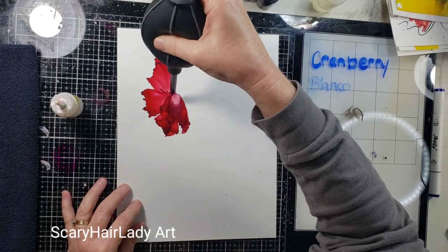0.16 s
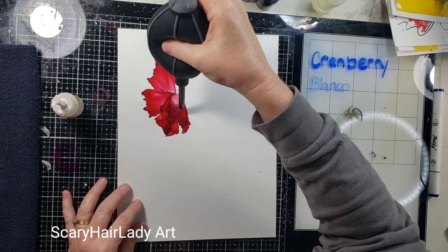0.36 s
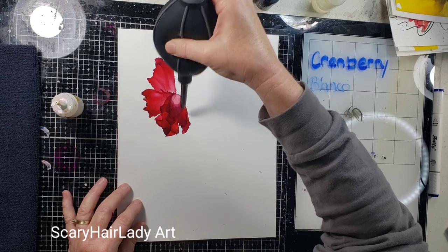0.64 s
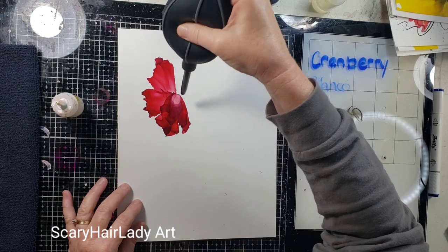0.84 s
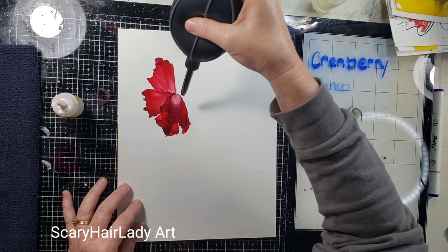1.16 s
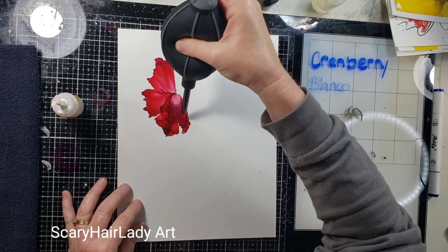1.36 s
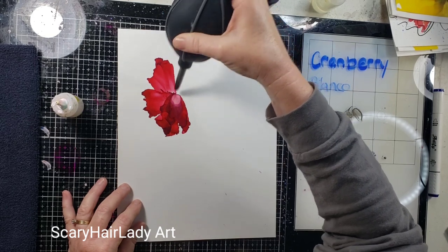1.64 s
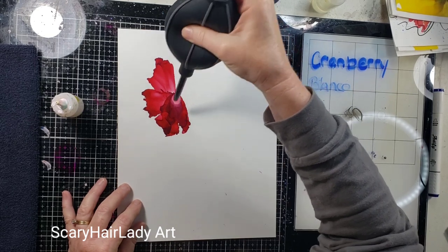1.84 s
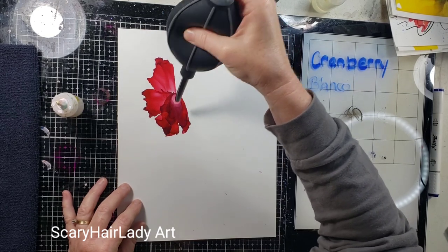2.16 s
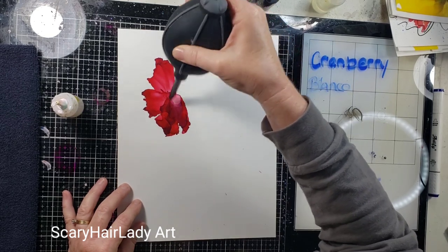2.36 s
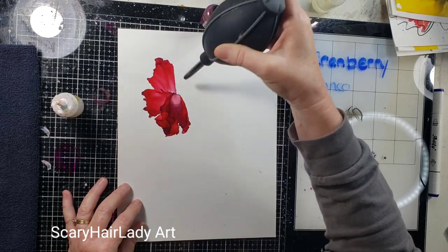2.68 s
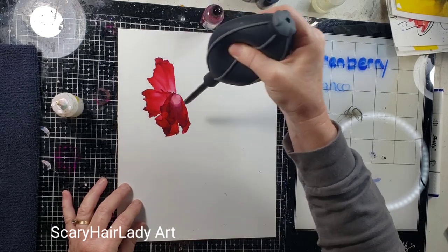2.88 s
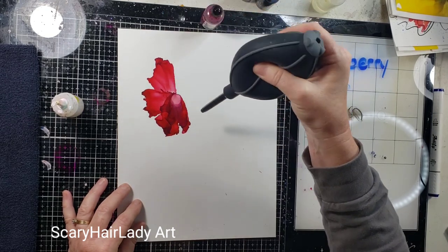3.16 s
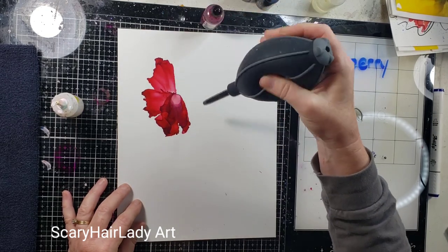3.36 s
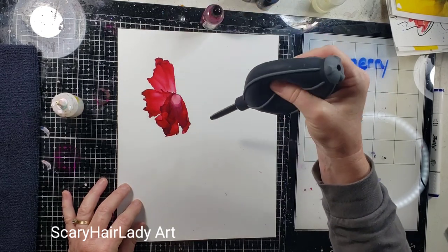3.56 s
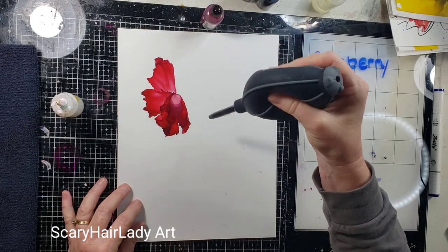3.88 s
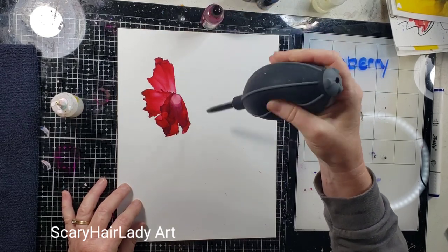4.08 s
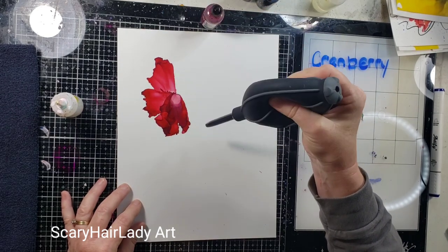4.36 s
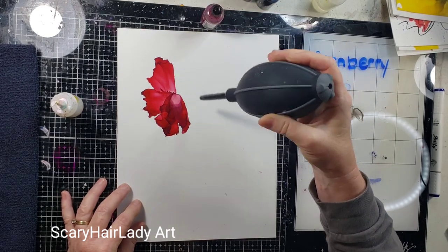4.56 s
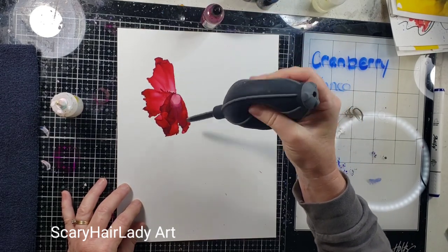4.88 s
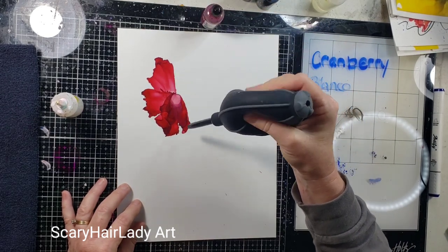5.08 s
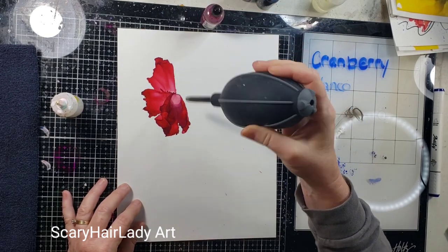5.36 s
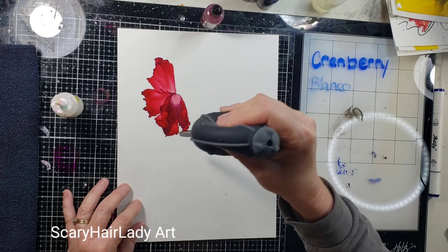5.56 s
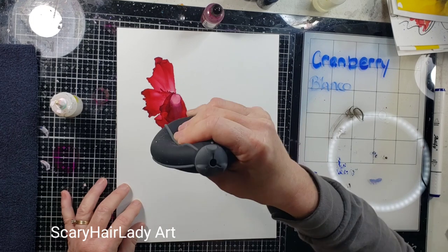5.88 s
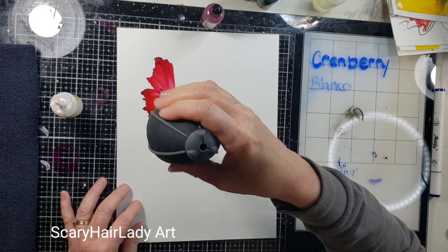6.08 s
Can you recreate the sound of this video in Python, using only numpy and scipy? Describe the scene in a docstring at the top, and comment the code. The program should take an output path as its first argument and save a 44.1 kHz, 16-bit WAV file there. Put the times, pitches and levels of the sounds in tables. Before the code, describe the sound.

A rubber bulb blower is pumped about three times a second, hissing sharp air jets and thinner intake hisses, with dull rubber thumps later.

```python
"""Rubber bulb blower, pumped by hand

A rubber bulb blower is pumped about three times a second over a desk, in a small quiet room.
Each squeeze is an arch of shaped noise, a hissing jet; each release is a thinner, at times whistling hiss.
Soft ticks of the valve flap come first. Halfway the pumping gets harder, and the rubber thumps as it folds
and springs back: short sums of decaying modes. Faint rumble, hiss and mains hum lie underneath."""
import sys
import numpy as np
from scipy import signal
from scipy.fft import rfft, irfft
from scipy.io import wavfile
from scipy.ndimage import uniform_filter1d

SR = 44100
rng = np.random.default_rng(int(sys.argv[2]) if len(sys.argv) > 2 else 0)


def master_out(mix):
    """Clip the mix to full scale and print it as 16-bit PCM to the path in sys.argv[1]."""
    frames = np.transpose(np.atleast_2d(mix))
    ceiling = np.clip(frames, -1, 1)
    pcm = np.round(ceiling * 32767).astype(np.int16)
    wavfile.write(sys.argv[1], SR, pcm)


N = 274741


def gain_of(db):
    """Decibels to amplitude."""
    return 10 ** (np.asarray(db) / 20)


def evened(x):
    """Scales to rms 1."""
    return x / np.sqrt(np.mean(x ** 2) + 1e-20)


def read(points, hz):
    """Reads a table of (frequency, value) on a log-frequency axis."""
    f, value = np.transpose(points)
    return np.interp(np.log(hz + 1), np.log(f + 1), value)


def read_at(points, time_s):
    """Reads a table of (time, value) along straight lines."""
    return np.interp(time_s, *np.transpose(points))


def add(mix, s, sound):
    """Adds a stereo sound to the mix at time s."""
    part = mix[:, max(round(s * SR), 0):][:, :sound.shape[1]]
    part += sound[:, :part.shape[1]]


def panned(left_db):
    """Gains of the two microphones for a left-right difference in dB."""
    return gain_of(np.array([[.5], [-.5]]) * left_db)


def noise_pair(size, likeness):
    """Spectra of two white noises that are partly alike (likeness 1: identical)."""
    a, b = rfft(rng.standard_normal((2, size)))
    c = np.clip(likeness, -1, 1)
    return np.array([a, c * a + np.sqrt(1 - c ** 2) * b])


def band_noise(size, hz, width_hz, likeness):
    """Stereo noise in one resonance, rms 1."""
    f = np.fft.rfftfreq(size, 1 / SR)
    resonance = 1 / (1 + (2 * (f - hz) / width_hz) ** 2)
    return evened(irfft(noise_pair(size, likeness) * resonance, size))


# colour of the room's rumble and hiss: pitch_hz, relative density (dB per Hz)
FLOOR_COLOUR = [(20, -18.5), (40, -7.5), (65, 6.5), (100, -3.5), (140, -7.5), (250, -14.5), (500, -22),
                (800, -15.5), (1200, -25), (3000, -28), (8000, -26.5), (15000, -20)]
# partials of the mains hum: pitch_hz, level_db (rms, before the hum trim and its wavering)
HUM_PARTIALS = [(59.2, -81), (242.2, -93), (301.5, -95.5), (360.7, -96), (479.1, -97.5), (839.8, -93.5)]


def background():
    """Low rumble of the building and faint hiss as shaped noise, with a wavering mains hum of sines."""
    hz, t = np.fft.rfftfreq(N, 1 / SR), np.arange(N) / SR
    likeness = read([(100, 0.85), (300, 0.35), (1000, 0.117), (5000, 0.12)], hz)
    wash = evened(irfft(noise_pair(N, likeness) * gain_of(read(FLOOR_COLOUR, hz)), N))
    knots = np.arange(0, 7, .25)  # the hum's level takes a new random turn every quarter second
    hum = np.zeros(N)
    for pitch_hz, level_db in HUM_PARTIALS:
        waver_db = 0.97 * np.interp(t, knots, rng.standard_normal(len(knots)))
        sine = np.sqrt(2) * np.sin(2 * np.pi * (pitch_hz * t + rng.random()))
        hum += gain_of(level_db + waver_db) * sine
    return panned(-1.3) * (gain_of(-68.0) * wash + gain_of(1.5) * hum)


# reverberation of the room: pitch_hz, t60_s
ROOM_DECAY = [(150, 0.143), (1000, 0.331), (4000, 0.2384), (8000, 0.1812), (15000, 0.138)]


def room(x):
    """Sparse reflections of random sign, each band dying at its own speed."""
    size = SR // 2
    taps = np.zeros((2, size))
    at = np.arange(220, size - 20, 20)  # one reflection in every 20 samples, after the first 5 ms
    at = at + rng.integers(0, 20, (2, len(at)))
    np.put_along_axis(taps, at, rng.choice([-1., 1.], at.shape), 1)
    hz, t, z = signal.stft(taps, SR, nperseg=256)
    decay = gain_of(-60 * t / read(ROOM_DECAY, hz)[:, None])
    tail = signal.istft(z * decay, SR, nperseg=256)[1]
    return signal.fftconvolve(x, tail / np.linalg.norm(tail[0]), axes=1)[:, :N]


# first reflections off the desk and the near walls: delay_s, gain
FIRST_REFLECTIONS = [(0.0157, 0.368), (.025, 0.303), (.037, .35), (0.051, 0.238)]


def slapped(x):
    """A sound with its first few reflections, plain delayed copies."""
    out = x.copy()
    for delay_s, gain in FIRST_REFLECTIONS:
        add(out, delay_s, gain * x)
    return out


# modes of the rubber bulb: pitch_hz (before a random detune), level_db (before tilt), t60_s (before damping)
BULB_MODES = [(140.2, -0.5, 0.0828), (176.65, 1.5, 0.0786), (290.6, -2.5, 0.0853), (348.5, -10.5, 0.065),
              (523.7, -20.5, 0.0725)]


def thump(tilt_db, damping):
    """The bulb's modes after one blow, peak 1; a sharper blow favours the higher ones (dB an octave)."""
    t = np.arange(8192) / SR
    lowest_hz = BULB_MODES[0][0]
    ring = np.zeros(len(t))
    for pitch_hz, level_db, t60_s in BULB_MODES:
        fading_db = level_db + tilt_db * np.log2(pitch_hz / lowest_hz) - 60 * damping * t / t60_s
        ring += gain_of(fading_db) * np.sin(2 * np.pi * pitch_hz * rng.uniform(0.919, 1.03) * t)
    ring *= 1 - np.exp(-t / 0.00474)  # soft onset
    return ring / abs(ring).max()


# the bulb springs back to shape with a last gulp of air: start_s, thump_db, gulp_db (before its trim)
SPRING_BACKS = [(3.302, -57, -56.5), (3.64, -52.5, -48.5), (3.986, -49.5, -44.5), (4.397, -49, -42.5),
                (4.811, -48, -44), (5.211, -48, -43.5), (5.618, -53.5, -44.5), (5.959, -51, -41)]
# the rubber wall buckles under the thumb: start_s, level_db (of the knock; the snap is trimmed from it)
BUCKLES = [(3.717, -58), (4.081, -62), (4.515, -56.5), (4.931, -51), (5.323, -50.5), (5.688, -56.5),
           (6.041, -52.5)]


def rubber():
    """The wall springs back with a thump and a gulp of air, and folds with a knock and a faint snap."""
    thumps, hiss = np.zeros((2, N)), np.zeros((2, N))
    swell = np.hanning(1500)
    t = np.arange(len(swell)) / SR
    for start_s, thump_db, gulp_db in SPRING_BACKS:
        add(thumps, start_s, gain_of(thump_db) * panned(-2.17) * thump(tilt_db=-3.5, damping=1.115))
        gulp = band_noise(len(t), 7600, width_hz=5710, likeness=0) * swell
        add(hiss, start_s - .003, gain_of(gulp_db - 3.5) * panned(0.89) * gulp)
    for start_s, level_db in BUCKLES:
        add(thumps, start_s, gain_of(level_db) * panned(-2.2) * thump(tilt_db=8, damping=2.44))
        snap = band_noise(len(t), 2500, width_hz=14600, likeness=0.56) * np.exp(-t / 0.0032)
        add(hiss, start_s, gain_of(level_db - 13.0) * snap)
    return slapped(thumps) + hiss


# the valve flap ticks shut ahead of a gentle squeeze: start_s, level_db (before the tick trim)
FLAP_TICKS = [(0.19, -55.5), (0.5402, -58), (0.8764, -56), (1.214, -54), (1.5628, -53.5), (1.915, -52),
              (2.2752, -54), (2.6279, -49), (3.0034, -47.5)]


def valve_ticks():
    """A tiny, soft tick of very high noise each time the flap closes."""
    out = np.zeros((2, N))
    swell = np.hanning(700)
    for start_s, level_db in FLAP_TICKS:
        tick = band_noise(len(swell), 16460, width_hz=4100, likeness=.4) * swell
        add(out, start_s - .001, gain_of(level_db - 10.5) * panned(-19.5) * tick)
    return out


# the intake briefly sings on one resonance: middle_s, length_s, pitch_hz, level_db (before the whistle trim)
INTAKE_WHISTLES = [(1.794, 0.088, 10750, -51.5), (2.135, 0.0384, 10780, -49), (2.498, 0.088, 10720, -52),
                   (2.863, 0.091, 10660, -48), (3.571, .05, 12800, -49.5), (3.937, .08, 12460, -53.5),
                   (4.778, 0.073, 12940, -44.5)]


def whistles():
    """Short swells of narrow noise where the indrawn air excites a single resonance."""
    out = np.zeros((2, N))
    for middle_s, length_s, pitch_hz, level_db in INTAKE_WHISTLES:
        size = int(length_s * SR)
        tone = evened(band_noise(8192, pitch_hz, width_hz=170, likeness=0.56)[:, :size])
        swell = np.hanning(size)
        add(out, middle_s - length_s / 2, gain_of(level_db - 5.0) * panned(-17.5) * tone * swell)
    return out


# resonances of the air passage: pitch_hz, width_hz, gentle_db, hard_db
# (boosts in a gentle and in a hard stream, before the stroke's pipe share)
PASSAGE_MODES = [(2280, 350, 5, 1), (6800, 400, 2, 1), (8700, 500, 1, 3), (10700, 300, 9, 7),
                 (12800, 400, 4, 9), (14850, 350, 4, 10)]


def passage_db(hz, level_db):
    """Boost of the air passage; a faster stream excites its higher resonances."""
    hard = np.clip((level_db + 48) / 7, 0, 1)
    boost_db = 0
    for pitch_hz, width_hz, gentle_db, hard_db in PASSAGE_MODES:
        mode_db = gentle_db + hard * (hard_db - gentle_db)
        boost_db = boost_db + mode_db / (1 + (2 * (hz - pitch_hz) / width_hz) ** 2)
    return boost_db


def stroke(start, peak, end, level_db, arch_db, low_db, high_db, pan_db, lead_ms, colour, balance, open_s,
           close_s, pipe_share, likeness, roar_growth, edge_tone_db, fullness, flutter_db, desk_echo):
    """One rush of turbulent air: coloured noise that swells and stops with the flow."""
    size = 16384
    hz = np.fft.rfftfreq(size, 1 / SR)
    t = start - .02 + np.arange(size) / SR
    lows = read([(500, 0.033), (1400, 1.415), (3000, 1.04), (6000, 0.347)], hz)
    highs = 1 / (1 + (10500 / (hz + 1)) ** 12)
    ears = panned(read(balance, hz) + pan_db)
    z = noise_pair(size, likeness) * ears / np.linalg.norm(ears, axis=0)
    colour_db = read(colour, hz) + pipe_share * passage_db(hz, level_db)
    z *= gain_of(colour_db + low_db * lows + high_db * highs)
    # the desk and the things on it throw the hiss back, combing it anew in every stroke
    echo_colour = desk_echo * (1 - np.exp(-hz / 2500)) / (1 + (hz / 9000) ** 2)
    for delay_s in rng.uniform(0.0005986, .004, 3):
        z *= 1 + echo_colour * np.exp(-2j * np.pi * hz * delay_s)
    z[1] *= np.exp(-2j * np.pi * hz * lead_ms / 1000)  # a positive lead delays the right microphone
    whole = irfft(z)
    roar = irfft(z / (1 + (hz / 5500) ** 6))
    edge_tone = irfft(z / (1 + ((hz - 8650) / 750) ** 2))
    # the flow arches over the stroke: offset is -1 at the start, 0 at the peak, 1 at the end
    offset = np.where(t < peak, (t - peak) / (peak - start), (t - peak) / (end - peak))
    flutter = evened(uniform_filter1d(uniform_filter1d(rng.standard_normal(size), 260), 130))
    flow = gain_of(-arch_db * np.minimum(abs(offset) ** fullness, 2) + flutter_db * flutter)
    valve = np.clip((t - start) / open_s + .5, 0, 1) * np.clip((end - t) / close_s + .5, 0, 1)
    # the hiss follows the flow; the lower roar grows by its own power of it
    air = (whole - roar) * flow + roar * flow ** roar_growth
    # the stream starts as a narrow hiss at the rim of the opening
    air += gain_of(edge_tone_db) * edge_tone * np.clip(-offset, 0, 1) * flow ** .5
    return t[0], gain_of(level_db) * valve * air / whole.std()


# colour of the indrawn air: pitch_hz, relative density (dB per Hz)
INTAKE_COLOUR = [(150, -45.5), (400, -23), (1100, -22), (1600, -17.5), (3000, -11.5), (5000, -7), (6600, 2),
                 (7400, 1.5), (8700, 1), (9600, -4.5), (11300, 0.5), (12200, -2.5), (13800, -3),
                 (15500, -5)]
# the left microphone hears less of its top treble: pitch_hz, left-right difference (dB)
INTAKE_LEFT_RIGHT = [(1000, 2.5), (6000, 0.5), (7400, 2.5), (8600, 10), (9600, -1.5), (10800, -10.5),
                     (12500, -18.5), (13600, -19), (15000, -27)]
# the hand carries the intake to the right and back: time_s, lead_ms of the left microphone
INTAKE_PATH = [(.07, 0.0701), (2.87, 0.0652), (3.24, -0.0808), (4.36, -0.0933), (5.57, -0.0544),
               (5.93, 0.0865)]


def refill(start, length, level_db):
    """Air drawn back in: the deeper the squeeze was, the louder, flatter, brighter and fuller the hiss."""
    shallow_db, deep_db = -46, -45.5  # levels of a shallow and of a deep refill
    depth = np.clip((level_db - shallow_db) / (deep_db - shallow_db), 0, 1)
    # both peak near the middle; a shallow refill swells and fades more, a deep one stays more even
    peak = start + np.interp(depth, (0, 1), (0.478, 0.515)) * length
    arch_db = np.interp(depth, (0, 1), (11.5, 5))
    # above -44 dB the intake starts to roar; its top treble rises with its level throughout
    low_db = -4 + 2.5 * max(level_db + 44, 0)
    high_db = 0.57 + 0.3066 * (level_db - shallow_db)
    return stroke(start, peak, start + length, level_db, arch_db, low_db, high_db, pan_db=0,
                  lead_ms=read_at(INTAKE_PATH, peak), colour=INTAKE_COLOUR, balance=INTAKE_LEFT_RIGHT,
                  open_s=.03, close_s=.024, pipe_share=0.751, likeness=0.62, roar_growth=1.157,
                  edge_tone_db=-16.5, fullness=1.8, flutter_db=-0.205, desk_echo=0.482)


# colour of the outgoing jet: pitch_hz, relative density (dB per Hz)
JET_COLOUR = [(150, -41), (400, -27.5), (1100, -34), (1800, -27), (2300, -21.5), (3500, -17.5), (5000, -13),
              (6000, -5.5), (6900, 0.5), (8400, 0.5), (9700, -4), (10900, -2), (12500, -6.5), (15500, -10)]
# the left microphone hears less of its top treble: pitch_hz, left-right difference (dB, before panning)
JET_LEFT_RIGHT = [(1000, 2), (6000, 0), (7400, 2.5), (8600, 6), (9600, 3.5), (10800, -19.5), (12500, -10),
                  (13600, -32), (15000, -46)]
# the hand carries the nozzle to the right and back: time_s, lead_ms of the left microphone
NOZZLE_PATH = [(.25, 0.0957), (1.3, 0.0405), (2.35, 0.0396), (2.7, -0.027), (3.09, -0.071), (4.0, -0.1063),
               (5.41, -0.0861), (5.77, 0.018), (6.12, 0.0632)]
# boost of the jet's top treble: time_s, boost_db
JET_TOP = [(.25, 1), (2.35, 4), (3.5, 4), (4.5, 2), (6.12, 0)]


def squeeze(start, length, level_db):
    """The jet from the nozzle: a steep arch of hiss, heard from wherever the hand holds it."""
    peak = start + 0.6255 * length
    lead_ms = read_at(NOZZLE_PATH, peak)
    pan_db = 13.5 * lead_ms  # louder on the side that it reaches first
    return stroke(start, peak, start + length, level_db, arch_db=32, low_db=2.5,
                  high_db=read_at(JET_TOP, peak), pan_db=pan_db, lead_ms=lead_ms,
                  colour=JET_COLOUR, balance=JET_LEFT_RIGHT, open_s=.02, close_s=.032, pipe_share=0.18,
                  likeness=0.724, roar_growth=0.915, edge_tone_db=-2.5, fullness=2.264, flutter_db=0.6,
                  desk_echo=0.655)


def swirled(x, patchy_db):
    """Eddies brighten and dull patches of hiss, about a kilohertz wide and some hundredths of a second long."""
    z = signal.stft(x, SR, nperseg=256)[2]
    patches = rng.standard_normal(z.shape[1:])
    for axis in (0, 1, 0, 1):
        patches = uniform_filter1d(patches, size=7, axis=axis)
    return signal.istft(z * gain_of(patchy_db * evened(patches)), SR, nperseg=256)[1][:, :N]


# releases, each sucking the bulb full again: start_s, length_s, level_db
RELEASES = [(0.014, 0.11, -49), (0.35, 0.1266, -53.5), (0.693, 0.116, -50.5), (1.033, 0.1217, -49.5),
            (1.37, 0.1294, -49), (1.732, 0.1276, -47), (2.088, 0.122, -48), (2.444, 0.1294, -48.5),
            (2.815, 0.1217, -43.5), (3.179, 0.1234, -44.0), (3.539, 0.1137, -43.0), (3.895, 0.1137, -42),
            (4.305, 0.1195, -40.5), (4.724, 0.1123, -39), (5.116, 0.1232, -40.5), (5.52, 0.1167, -41.0),
            (5.873, 0.109, -42.5), (6.22, 0.122, -41.5)]
# squeezes, each driving a jet out of the nozzle: start_s, length_s, level_db
PUMPS = [(0.195, 0.1026, -40), (0.546, 0.0967, -40.5), (0.883, 0.1053, -41.5), (1.219, 0.1169, -38.5),
         (1.571, 0.1147, -37.5), (1.926, 0.1099, -36.5), (2.276, 0.1283, -39.5), (2.639, 0.1022, -37.0),
         (3.016, 0.1109, -33.5), (3.374, 0.1198, -33.5), (3.725, 0.1214, -33.5), (4.1, 0.1251, -35.0),
         (4.526, 0.1358, -34.5), (4.934, 0.14, -35), (5.332, 0.1315, -35), (5.7, 0.121, -33),
         (6.051, 0.1206, -33.5)]


def airflow():
    """Refills in, jets out and the short whistles of the intake, all stirred by the same eddies."""
    out = whistles()
    for row in RELEASES:
        add(out, *refill(*row))
    for row in PUMPS:
        add(out, *squeeze(*row))
    return swirled(out, patchy_db=2.0566)


def scene():
    """The blower close to the microphones, its room and the background."""
    air = airflow() + valve_ticks()
    knocks = rubber()
    reverb = gain_of(-10.0) * room(air) + gain_of(-11.5) * room(knocks)
    return air + knocks + reverb + background()


def record(dry):
    """The recorder's band limit: a steep low-pass at 15650 Hz."""
    low_pass = signal.firwin(511, 15650, window=("kaiser", 9), fs=SR)
    return signal.oaconvolve(dry, low_pass[None], "same", axes=1)


dry = scene()
out = record(dry)
master_out(out)
```